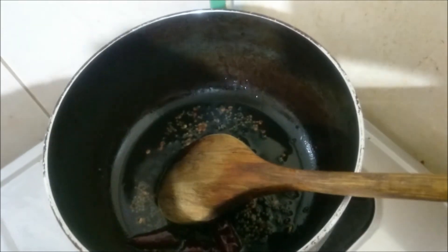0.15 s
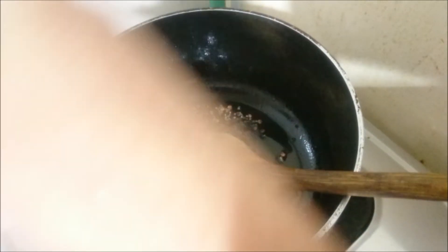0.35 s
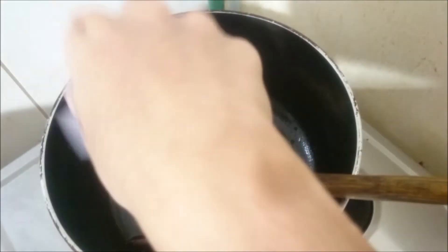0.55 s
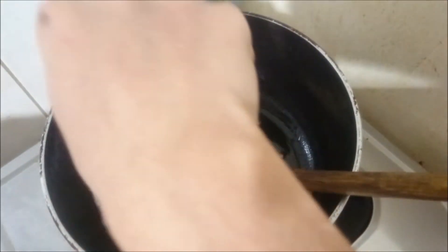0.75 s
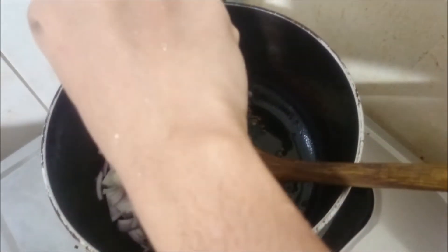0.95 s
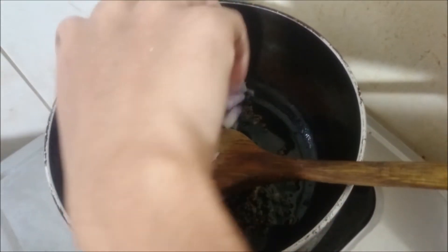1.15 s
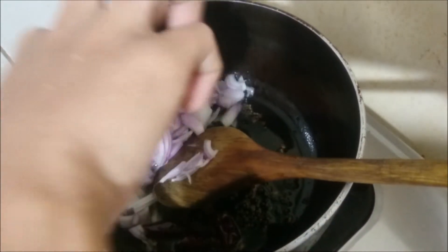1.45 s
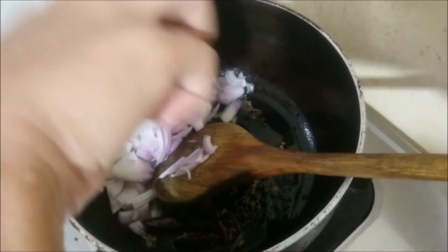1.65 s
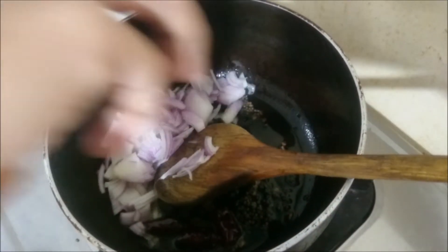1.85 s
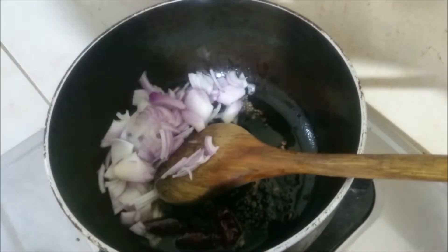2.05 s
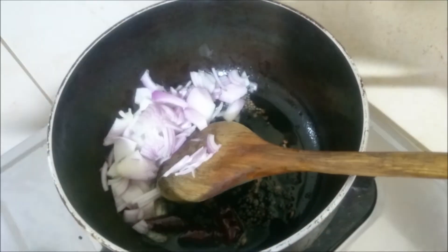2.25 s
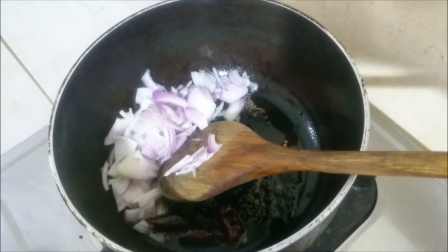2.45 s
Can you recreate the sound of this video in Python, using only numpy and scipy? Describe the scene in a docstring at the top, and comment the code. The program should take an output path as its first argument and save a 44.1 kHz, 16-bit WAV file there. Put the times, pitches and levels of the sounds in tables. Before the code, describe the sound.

A loud sizzle of onion frying in oil, heard up close in a kitchen. It begins after a near-quiet moment with soft handling bumps, swells quickly, then eases a little while sharp pops of steam keep coming.

```python
"""A soft bump and the spit of one stray drop come first; then sliced onion lands in hot oil and sizzles.
The water in the slices boils off as thousands of tiny bursts, with louder pops of steam among them.
The walls of the deep pan and the kitchen throw each burst back. Under it all lie a faint hiss and the
rumble of a hand-held microphone with two openings, left and right. The biggest pops overload it."""
import sys
import numpy as np
from scipy import signal
from scipy.io import wavfile
from scipy.ndimage import uniform_filter1d, minimum_filter1d

SR = 44100
rng = np.random.default_rng(int(sys.argv[2]) if len(sys.argv) > 2 else 0)


def transcribe(signal):
    """Save signal, clipped to [-1, 1], as a 16-bit WAV file at the path in sys.argv[1]."""
    frames = np.atleast_2d(signal).T
    limited = np.clip(frames, -1, 1)
    pcm = np.round(limited * 32767).astype(np.int16)
    wavfile.write(sys.argv[1], SR, pcm)


N = 114660
T = np.arange(N) / SR
HIGHEST_HZ = 15750

# how hard the oil boils (time [s], fizz level [dB], crackle level [dB])
BOIL = [(.734, -70, -70), (0.737, -38, -57), (0.759, -30.5, -29.5), (.782, -25.5, -21.5), (.83, -18, -35),
        (.9, -19, -17.5), (1.02, -16, -26.5), (1.06, -19, -24), (1.14, -18, -21.5), (1.235, -22.5, -25.5),
        (1.29, -20.5, -16.5), (1.38, -22, -23), (1.46, -23, -25.5), (1.524, -19.5, -14),
        (1.6, -25.5, -24.5), (1.73, -25.5, -24.5), (1.9, -27, -24), (2.1, -24, -26), (2.18, -24, -29.5),
        (2.24, -27.5, -25.5), (2.42, -31.5, -26), (2.6, -23.5, -28)]
# ringing of the pan's air and wall (pitch [Hz], level [dB], time to fade by 60 dB [s])
PAN_RING = [(671, -52, 0.083), (782, -51.5, 0.21), (1455, -41, 0.029), (2196, -56, 0.06),
            (2480, -67, 0.045), (3060, -41, 0.089), (5200, -53, 0.051)]
# tone colour of the bursts (frequency [Hz], level [dB])
SIZZLE_COLOUR = [(59, -67), (100, -32), (319, -28.5), (386, -28.5), (519, -28.5), (774, -19.5), (861, -22),
                 (1130, -21), (1430, -15.5), (1920, -17.5), (2220, -9.5), (3120, -13.5), (3390, -12),
                 (4370, -2.5), (4960, -3.5), (5400, 3), (6810, -3.5), (9540, -6.5), (11800, -13),
                 (13700, -14.5), (15500, -28.5)]
# tone colour of the ticks of spattering oil (frequency [Hz], level [dB])
TICK_COLOUR = [(150, -75), (800, -37), (3000, -9), (6000, -14), (9500, -2), (15000, -1.5)]

def sizzle():
    """Water boils off as dense fizz and sparser crackle that ring the pan; spattering oil ticks."""
    times, fizz_db, crackle_db = np.transpose(BOIL)
    fizz, crackle = (amp(np.interp(T, times, db)) * (T > times[0]) for db in (fizz_db, crackle_db))
    oil = bubbles(per_s=7000, spread_db=2, level=fizz, spots=20)
    oil += cut_bass(bubbles(per_s=560, spread_db=5.5, level=crackle, spots=32), hz=650)
    oil += signal.fftconvolve(oil, ringing(PAN_RING)[None], axes=1)[:, :N]
    ticks = bubbles(per_s=70, spread_db=6, level=crackle, spots=12, echo_db=-8)
    return tint(oil, SIZZLE_COLOUR) + amp(-10) * tint(ticks, TICK_COLOUR)


def bubbles(per_s, spread_db, level, spots, echo_db=0, middle_hz=5923, biggest_db=14):
    """Bubbles of random size burst at random times; each spot in the oil has its own pitch."""
    out, power = np.zeros((2, N)), 0
    for place in np.linspace(-1, 1, spots):
        size = amp(np.minimum(spread_db * rng.exponential(1, N), biggest_db))
        clicks = size * rng.choice([-1, 1], N) * (rng.random(N) < per_s / spots / SR)
        hz = min(middle_hz * np.exp(0.826 * place), HIGHEST_HZ)
        shape = burst(hz, echo_db)
        out += signal.fftconvolve((clicks * level)[None], shape, axes=1)[:, :N]
        power += np.mean(clicks ** 2) * np.sum(shape ** 2) / 2
    return out / np.sqrt(power)  # the average strength now follows level


def burst(hz, echo_db, cycles=2.8, ring=0.16):
    """One steam bubble breaks: a click and a few dying vibrations, with their echoes."""
    t = T[:512]
    snap = ring * np.exp(-t * hz / cycles) * np.cos(2 * np.pi * hz * t)
    snap[0] += 1
    return at_microphone(snap, echo_db)


# loud pops of steam (time [s], relative level [dB], ring pitch [Hz], share that rings [0-1],
# left over right [dB], relative thump level [dB])
POPS = [(0.744, -30, 10100, 0.34, -11.5, -58), (0.7794, -13.5, 5990.0, 0, -11, -56),
        (0.8818, -10.8, 5850, 0.1, -16, -49), (0.9445, -12, 5170, 0.55, 7, -54),
        (0.9799, -6.5, 4250, 0.79, -2, -24.5), (1.0028, -5, 5270, 0, 6, -11),
        (1.0074, -14, 5300, 0, -12, -54), (1.082, -15, 5900, 0.03, 3.5, -60.0),
        (1.1175, -10, 5950, 0, 9, -58), (1.1562, -15, 5860, 0.2, 12, -30),
        (1.19, -13, 5250, 0.34, 7, -60.0), (1.2145, -15, 5400, 0.25, -11, -25.5),
        (1.217, -8.5, 4540, 0.63, -4, -42), (1.255, -21, 5750, 0.17, -10, -60.0),
        (1.2715, -11, 6500.0, 0.02, 0, -22.5), (1.2838, -9, 4650, 0.3, 6, -25.5),
        (1.3027, -9.5, 5200, 0, 4, -19.5), (1.3102, -21, 5200, 0.6, 21, -60.0),
        (1.33, -23, 5200, 0.5, 8, -60.0), (1.352, -20, 6100, 0.11, 8, -46),
        (1.3647, -13, 6040, 0.2, 7, -46.0), (1.4083, -10.5, 5640, 0, 2, -60.0),
        (1.452, -18, 5700, 0.1, 2, -63), (1.4806, -14, 5400, 0.9, 2, -41), (1.511, -10, 5380.0, 0, 1, -26),
        (1.525, -20, 4360, 0.44, 15, -55), (1.5495, -12, 3200, 1, 2, -55), (1.584, -12, 5480, 0.77, 3, -34),
        (1.6119, -11.5, 5500, 0.08, -3, -30), (1.6388, -14.9, 6260, 0.28, -1, -64),
        (1.69, -17.5, 5800, 1, 5, -60.0), (1.7695, -9.5, 7150, 0.43, 1, -39),
        (1.8317, -16, 9100, 0.15, -1, -60.0), (1.8637, -17, 5600, 0.6, 7, -60),
        (1.8732, -18, 5380.0, 1, 12, -57), (1.8869, -11, 6630, 0, -4, -60.0),
        (1.9627, -21, 9500, 0.9, 1, -58), (1.9966, -24, 8800, 0.7, -9.5, -47.0),
        (2.0378, -11, 5400, 0.44, 2.5, -61), (2.049, -14.5, 5600, 1, 7, -64),
        (2.0755, -14.5, 6840, 0.08, 1, -60.0), (2.1413, -18, 5500, 1, 8.5, -62),
        (2.1731, -13, 9200, 0.04, -2, -66), (2.1795, -15.5, 5680.0, 0.5, 2.5, -48),
        (2.1886, -14.5, 4370, 0.33, 9, -55.0), (2.2598, -24, 5450, 0.8, 20.5, -61),
        (2.3105, -13, 5800, 0.58, 2, -70), (2.3973, -23.5, 5340.0, 1, 13, -58),
        (2.4451, -18, 5700, 0.96, -13.5, -28.5), (2.4495, -12, 5440, 0, 9, -50),
        (2.4754, -20, 5500, 0, -2, -55), (2.4998, -18, 5430, 1, 3, -53), (2.521, -15.5, 5600, 0, 6, -26.5),
        (2.569, -13.5, 4940, 0.7, 4, -53)]

def pops(ring_cycles=2.9, thump_s=0.00016):
    """Large bubbles snap with a short, high ring, often the left microphone opening resonating."""
    out, t = np.zeros((2, N)), T[:SR // 80]
    for start, db, hz, ring_share, side_db, thump_db in POPS:
        echoes = echo_path(echo_db=0.5)
        age = t * hz / ring_cycles
        tone = np.sqrt(age) * np.exp(-age) * np.sin(2 * np.pi * hz * t)
        ring = signal.fftconvolve(echoes, tone[None], axes=1)
        snap = colour(echoes, SIZZLE_COLOUR)
        sides_db = np.array([[side_db], [-side_db]]) / 2
        level = amp(db + 1.5 + sides_db) * np.sqrt(0.003 * SR)  # 3 ms worth of energy
        for part, share in ((snap, 1 - ring_share), (ring, ring_share)):
            part = cut_bass(part, hz=2060)
            part /= np.linalg.norm(part, axis=1, keepdims=True)
            add(out, start, level * np.sqrt(share) * part)
        # a low thump, heard under the loudest pops as they overload the microphone
        thump_age = t / thump_s
        thump = (1 - 2 * thump_age + thump_age ** 2 / 2) * np.exp(-thump_age)
        add(out, start, amp(thump_db + 21) * at_microphone(thump, echo_db=-6.5))
    return out


# tone colour of the stray drop (frequency [Hz], level [dB])
SPIT_COLOUR = [(200, -40), (500, -16), (975, -11.5), (1800, -6.5), (2600, -6.5), (4100, -11), (5800, 0),
               (7500, -9.5), (15000, -32)]

def spit(start_s=0.427, rise_s=0.013, decay_s=0.025):
    """One drop of water flashes into steam with a short hiss."""
    age = T - start_s
    level = np.clip(age / rise_s, 0, 1) * np.exp(-np.maximum(age - rise_s, 0) / decay_s)
    return amp(-42) * tint(bubbles(per_s=7000, spread_db=1.7, level=level, spots=12), SPIT_COLOUR)


# slices landing (time [s], level [dB])
LANDINGS = [(.735, -53), (0.751, -45.5), (.794, -41)]
# dull ring of the pan bottom (pitch [Hz], relative level [dB], time to fade by 60 dB [s])
BOTTOM_RING = [(269, -2, 0.29), (389, -5, 0.3), (447, -6, 0.25), (795, -1.5, 0.051), (1107, 4.5, 0.12),
               (1320, 4.5, .06), (1500, 1.5, 0.042)]

def landings():
    """Soft slices pat the bottom of the pan and make it ring."""
    out = np.zeros((2, N))
    for start, db in LANDINGS:
        add(out, start, amp(db) * at_microphone(ringing(BOTTOM_RING)))
    return out


# bumps at the microphone (time [s], bump width [s], bump level [dB], rustle level [dB])
BUMPS = [(.238, 0.017, -37.5, -63.5), (.627, .016, -38.5, -66)]
# tone colour of the rustle (frequency [Hz], level [dB])
RUSTLE_COLOUR = [(500, -10), (2000, -16), (3500, -6), (4500, -19), (10000, -31)]

def handling():
    """Holding the microphone makes low bumps, mostly on the right, each with a longer, faint rustle."""
    out = np.zeros((2, N))
    for peak_s, width_s, bump_db, rustle_db in BUMPS:
        from_peak = (T - peak_s) / width_s
        out += amp([[bump_db - 26], [bump_db]]) * np.exp(-from_peak ** 2)
        rustle = tint(rng.standard_normal((2, N)), RUSTLE_COLOUR)
        out += amp(rustle_db) * np.exp(-(from_peak / 2.6) ** 2) * rustle
    return out


# tone colour of the quiet kitchen (frequency [Hz], level [dB])
HISS_COLOUR = [(59, -55), (100, -9), (192, -1), (238, -2.5), (287, -8), (403, -5), (429, -8), (564, -8.5),
               (627, -5), (843, -11), (1840, -12.5), (3540, -6.5), (4190, -9.5), (9150, -11.5),
               (15500, -21.5)]
# tone colour of the microphone's rumble (frequency [Hz], level [dB])
RUMBLE_COLOUR = [(5, -15), (14, 1.5), (30, -29.5), (55, -22), (100, -22), (180, -43), (600, -71)]

def kitchen():
    """Faint steady hiss, and the rumble of a hand-held microphone, which grows as the steam rises."""
    steam = np.clip((T - BOIL[0][0]) * 10, 0, 1)
    hiss, rumble = rng.standard_normal((2, 2, N))
    hiss = amp(-64.5) * unit(colour(hiss, HISS_COLOUR))
    rumble = amp([[-63.5], [-56.5]]) * unit(colour(rumble, RUMBLE_COLOUR, size=16384))
    return hiss + amp(5.5 * steam) * rumble


def echo_path(echo_db, size=8192, lag_s=0.00022, wall_decay_s=0.0014, room_fade_s=0.071):
    """A click in the pan arrives directly, then off the pan wall, then from around the room."""
    t = T[:size]
    wall, room = rng.standard_normal((2, 2, size))
    wall = unit(wall * (1 - np.exp(-t / lag_s)) * np.exp(-t / wall_decay_s))
    room = unit(room * (1 - np.exp(-t / wall_decay_s)) * amp(-60 * t / room_fade_s))
    out = amp(echo_db) * (amp(-1.5) * wall + amp(-6.5) * room) / np.sqrt(size)
    out[:, 0] += 1  # the direct sound
    right_delay_s = abs(lag_s + 0.00007 * rng.standard_normal())
    out[1] = np.roll(out[1], round(right_delay_s * SR))
    return out


def at_microphone(sound, echo_db=0):
    """Carries a sound from one spot in the pan to both openings, with echoes."""
    return signal.fftconvolve(echo_path(echo_db), sound[None], axes=1)


def ringing(tones):
    """Tones that die away after one tap."""
    t = T[:SR // 2]
    return sum(amp(db - 60 * t / fade_s) * np.cos(2 * np.pi * hz * t) for hz, db, fade_s in tones)


def colour(x, points, scale=1, size=4096):
    """Turns each frequency up or down along a curve of (frequency [Hz], level [dB]) points."""
    hz, db = np.transpose(points)
    freqs = abs(np.fft.fftfreq(size, 1 / SR))
    log_gain = np.log(amp(scale * np.interp(np.log(freqs + 1), np.log(hz + 1), db)))
    # this filter rings only after a click, never before it
    taps = np.fft.ifft(np.exp(np.conj(signal.hilbert(log_gain)))).real[:size // 2]
    return signal.fftconvolve(x, taps if x.ndim == 1 else taps[None], axes=-1)[..., :x.shape[-1]]


def tint(x, points):
    """Colours an even, hiss-like sound and keeps its level."""
    return colour(x, points) / np.linalg.norm(colour(signal.unit_impulse(SR // 10), points))


def cut_bass(x, hz):
    """Weakens everything below hz."""
    return signal.sosfilt(signal.butter(2, hz, "high", fs=SR, output="sos"), x)


def amp(db):
    """Turns decibels into a number to multiply by."""
    return 10 ** (np.asarray(db) / 20)


def unit(x):
    """Scales a sound to an average strength (rms) of 1."""
    return x / np.sqrt(np.mean(x ** 2) + 1e-20)


def add(mix, start_s, sound):
    """Mixes a sound in at the given time."""
    part = mix[:, round(start_s * SR):][:, :sound.shape[-1]]
    part += sound[..., :part.shape[1]]


def scene():
    """Everything that reaches the microphone."""
    return sizzle() + pops() + spit() + landings() + kitchen() + handling()


# tone contrast of the two openings; each takes a share (frequency [Hz], left over right [dB])
SIDE_CONTRAST = [(100, 2), (800, 2), (1500, 1.5), (1900, 6), (2300, 3.5), (3000, 1.5), (3900, 6),
                 (4500, 4.5), (4950, 9.5), (5300, 3.5), (5700, 6), (6200, 4), (7600, 0.5), (9400, -10),
                 (11500, -5.5), (12900, -2), (14400, 7.5), (15600, 14)]

def record(dry, ceiling=0.92, recovery_s=0.0006):
    """Each opening colours the sound; the loudest pops are turned down and the top treble is cut."""
    sound = np.array([colour(dry[0], SIDE_CONTRAST, 0.36), colour(dry[1], SIDE_CONTRAST, -0.59)])
    overload = np.log(abs(sound) / ceiling + 1e-9)
    recovery = T / recovery_s
    turn_down = np.maximum.accumulate(overload + recovery, axis=1) - recovery  # eases off after a peak
    held = -minimum_filter1d(-np.maximum(turn_down, 0), size=15, axis=1)
    sound /= np.exp(uniform_filter1d(held, size=15, axis=1))
    treble_cut = signal.firwin(511, HIGHEST_HZ, window=("kaiser", 9), fs=SR)
    return signal.oaconvolve(sound, treble_cut[None], "same")


dry = scene()
out = record(dry)
transcribe(out)
```